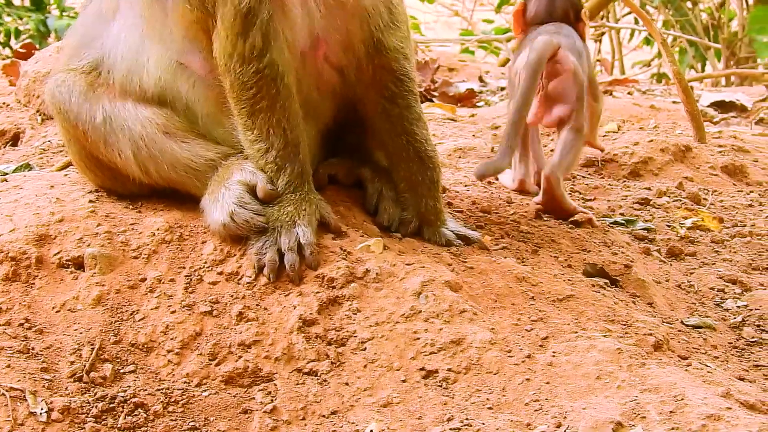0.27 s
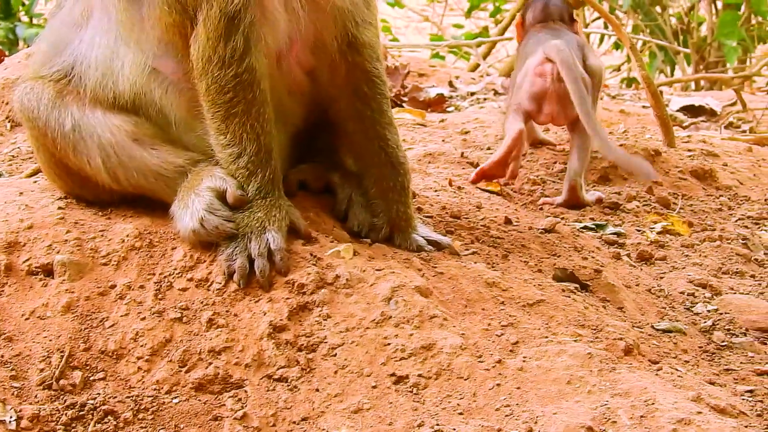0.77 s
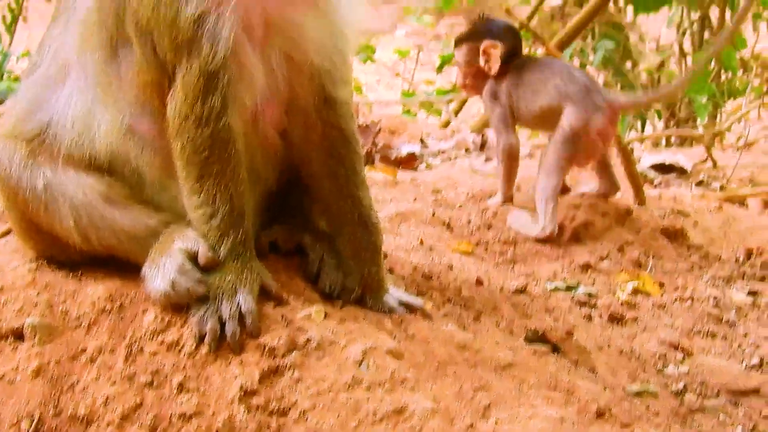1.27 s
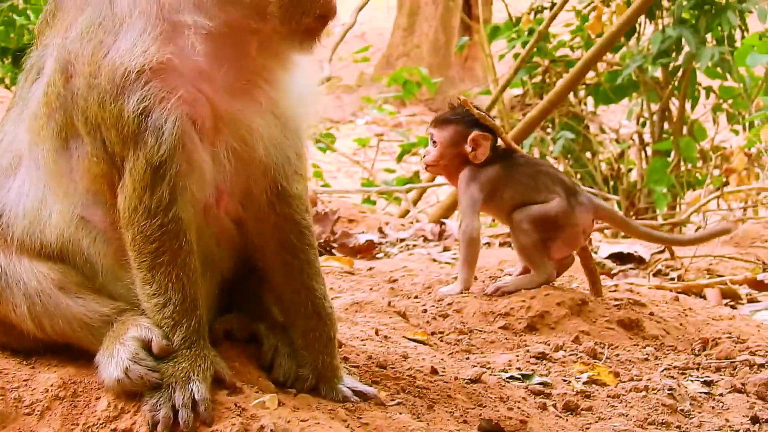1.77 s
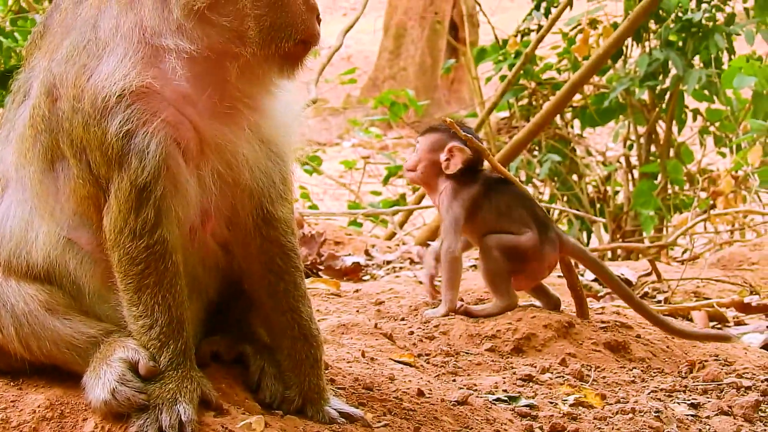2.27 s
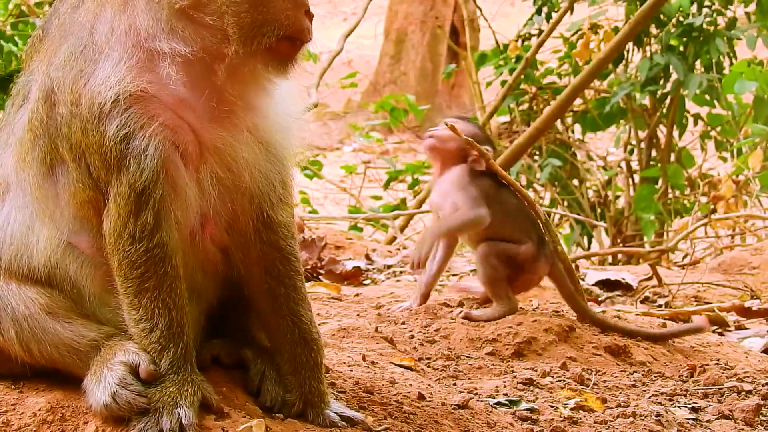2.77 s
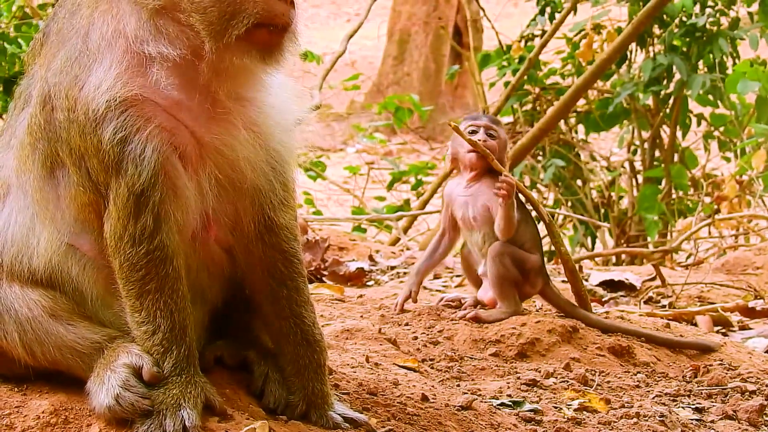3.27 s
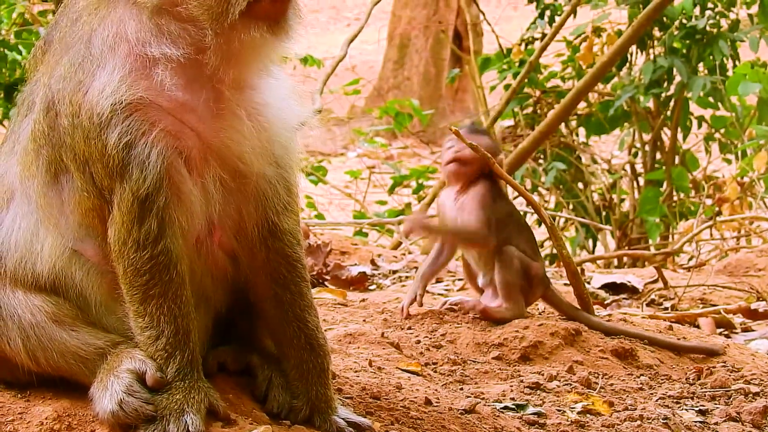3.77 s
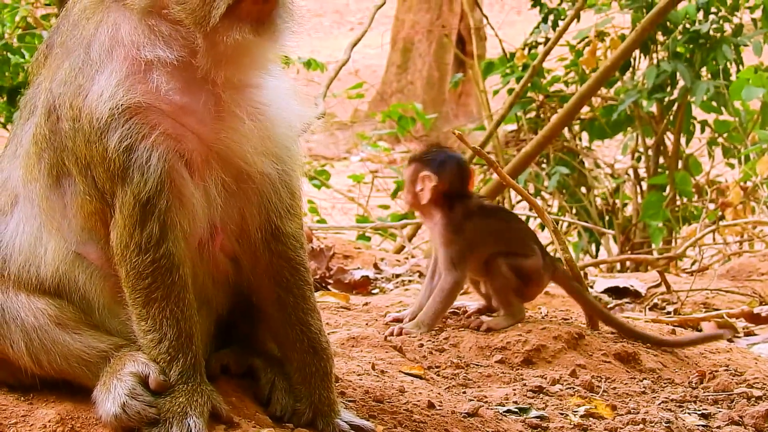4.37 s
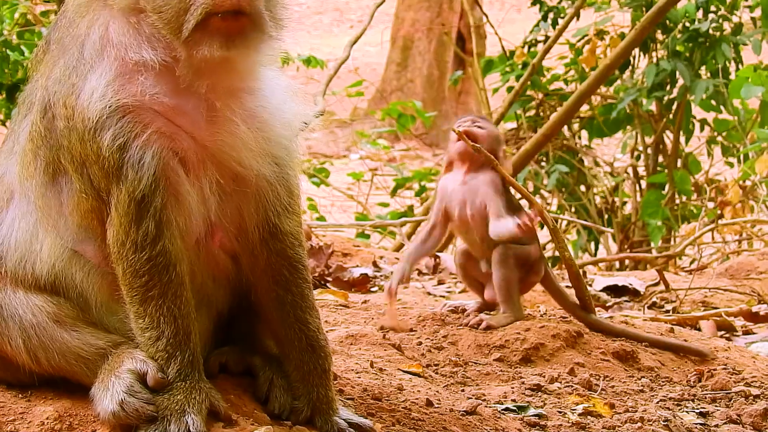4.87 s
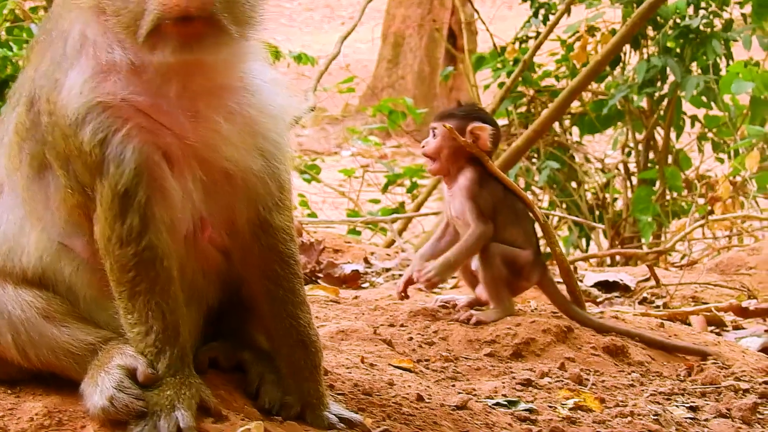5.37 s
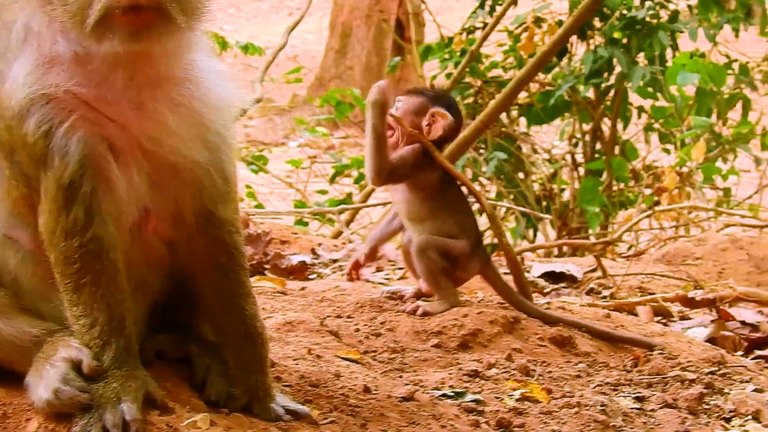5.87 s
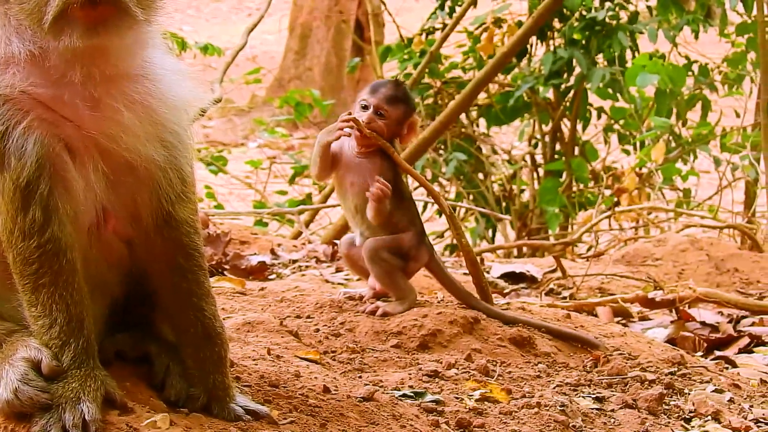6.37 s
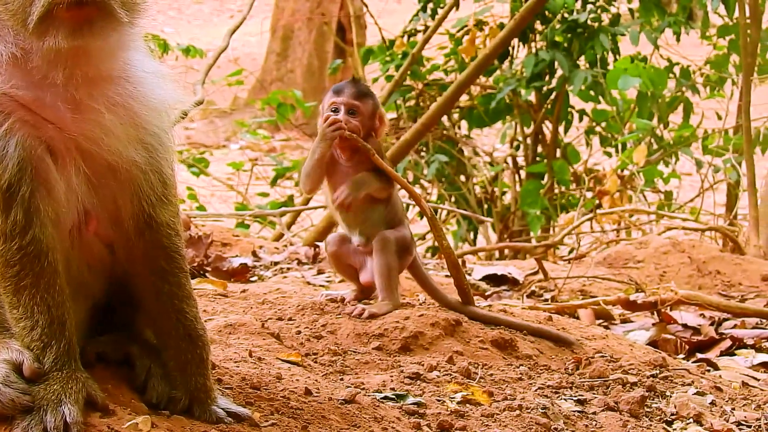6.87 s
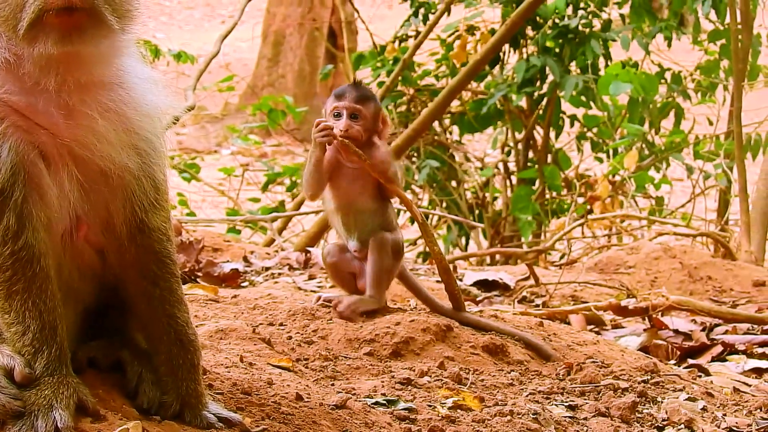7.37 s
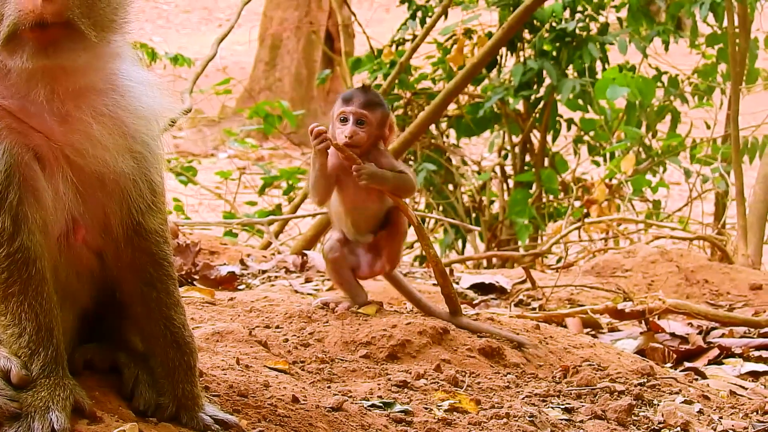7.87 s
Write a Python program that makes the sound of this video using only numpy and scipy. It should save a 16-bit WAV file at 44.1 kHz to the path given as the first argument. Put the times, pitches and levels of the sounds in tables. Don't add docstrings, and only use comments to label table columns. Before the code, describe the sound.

For about eight seconds a loud, dense cicada chorus fills a dry wood, a steady bright hiss and buzz strongest around 3 to 7 kHz, with a lower hum near 1.7 kHz. From the start a nearer cicada throbs raspily about seven times a second, quickening slightly. Around 3 seconds a second one joins with a very thin high whistle; the first fades by about 4.5, and the second continues, easing only at the very end. Far below lie faint traffic rumble, gliding engine tones and a low hum. Dry leaves rustle gently, more noticeably near 2.8 and 3.8. Small twig ticks come at 1.0 and 1.6, a snap at 1.65, a dull soil thump with a snap at 3.6, and a sharper knock and snap at 5.4. Soft distant bird hoots occur near 1.1 and 1.9, then from 6.2 to 7.7. Wide, open outdoor stereo.

```python
import sys
import numpy as np
from scipy import signal
from scipy.fft import rfft, irfft, next_fast_len
from scipy.io import wavfile

SR = 44100
rng = np.random.default_rng(int(sys.argv[2]) if len(sys.argv) > 2 else 0)


def makeup_ratio(level_db):
    decades = np.asarray(level_db, float) / 20
    return 10 ** decades


def pcm_store(signal):
    levels = np.round(np.clip(np.atleast_2d(signal), -1, 1) * 32767)
    wavfile.write(sys.argv[1], SR, levels.astype(np.int16).T)


N = 358533
TIME = np.arange(N) / SR
SIZE = next_fast_len(N + SR // 4)
HZ = np.maximum(np.arange(SIZE // 2 + 1) * SR / SIZE, 1)


def rms_one(x):
    return x / np.sqrt(np.mean(x ** 2) + 1e-20)


def in_time(rows):
    s, *columns = np.transpose(rows)
    return [np.interp(TIME, s, column) for column in columns]


def at_hz(points):
    hz, value = np.transpose(points)
    return np.interp(np.log(HZ), np.log(hz), value)


def filtered(x, gain):
    return irfft(rfft(x, SIZE) * gain, SIZE)[..., :N]


def drift(rate_hz):
    r = np.exp(-2 * np.pi * rate_hz * 40 / SR)
    noise = rng.standard_normal(N // 40 + 2002)
    slow = signal.lfilter([1], [1, -2 * r, r * r], noise)[2000:]
    return np.interp(np.arange(N) / 40, np.arange(len(slow)), rms_one(slow))


def resonance(x, hz, width_hz):
    r = np.exp(-np.pi * width_hz / SR)
    poles = [1, -2 * r * np.cos(2 * np.pi * hz / SR), r * r]
    return signal.lfilter([(1 - r * r) / 2, 0, (r * r - 1) / 2], poles, x + 1e-18)


def spread(mid, side, spectrum):
    # frequency in Hz, side minus mid in dB.
    width = [(60, -23), (99, -22), (160, -21), (270, -18.5), (450, -18), (740, -9), (1220, -14),
             (2010, -12), (3330, -11.5), (5500, -7.5), (9080, -2.5), (15000, -2)]
    colour = makeup_ratio(at_hz(spectrum))
    mid = filtered(mid, colour)
    side = filtered(side, colour * makeup_ratio(at_hz(width)))
    return (mid + side * [[1], [-1]]) / np.std(mid)


def traffic():
    # frequency in Hz, level in dB.
    rumble = [(21, -40), (36, -9), (70, -1.5), (123, 2.5), (139, 0), (199, -9), (253, -15), (347, -13),
              (505, -21), (633, -17.5), (713, -20.5), (1170, -21), (1300, -17.5), (1690, -40), (2860, -120)]
    # start in seconds, length in seconds, pitch in Hz, glide in Hz per second, level in dB.
    engines = [(-.2, 1.2, 136, 3.5, -54), (1.15, 1.8, 118, 11, -47), (3.2, .55, 133, 8, -41),
               (2.0, .95, 169, -2, -48), (5.7, 1.05, 132, 1, -46), (6.2, .5, 108, 4, -44),
               (6.75, .9, 111, 12, -45), (7.4, 1.0, 119, 16, -40), (6.8, 1.2, 140, 12, -52),
               (2.1, 1.0, 86, 4, -50), (5.7, 1.4, 87, 3, -49)]
    fade_s = .25
    road = makeup_ratio(-44.5 + .8 * drift(4.5)) * spread(*rng.standard_normal((2, N)), rumble)
    notes = makeup_ratio(-51 + 1.2 * drift(3)) * np.sin(2 * np.pi * 48.7 * TIME)
    for s, length_s, start_hz, glide, db in engines:
        hz = start_hz + glide * np.clip(TIME - s, 0, length_s)
        near = np.clip(np.minimum(TIME - s, s + length_s - TIME) / fade_s, 0, 1)
        turns = np.cumsum(hz + 0.7 * drift(2.5)) / SR
        notes += near * makeup_ratio(db + 1.9 * drift(4.6)) * np.sin(2 * np.pi * turns)
    return road + notes


def struck(events, rings_hz, widths_hz):
    out = np.zeros(N)
    for (s, db, *_), hz, width_hz in zip(events, rings_hz, widths_hz):
        at = round(s * SR)
        impulse = np.r_[1, np.zeros(SR // 8)]
        ring = resonance(resonance(impulse, hz, width_hz), hz, width_hz)[:N - at]
        out[at:at + len(ring)] += makeup_ratio(db) * ring / np.abs(ring).max()
    return out


def ground():
    # middle in seconds, length in seconds, level in dB.
    stirs = [(.25, .3, -50), (1.655, .04, -46), (2.84, .3, -41), (2.94, .08, -45), (3.24, .08, -49),
             (3.84, .2, -46), (4.08, .1, -47), (4.6, .3, -49), (4.9, .15, -49), (5.45, .03, -46),
             (6.47, .12, -52), (7.28, .14, -50), (8.08, .15, -46)]
    # time in seconds, peak in dB, pitch in Hz, bandwidth as a share of pitch.
    knocks = [
        (2.239, -43, 358, 0.23),
        (2.785, -43, 520, 0.26),
        (3.609, -51, 250, 0.22),
        (3.862, -43, 961, 0.17),
        (4.867, -49, 334, 0.2),
        (5.443, -36, 939, 0.2),
        (7.89, -43.5, 250, 0.26),
    ]
    # time in seconds, peak in dB, pitch in Hz.
    thumps = [
        (3.605, -28, 150),
    ]
    # time in seconds, peak in dB.
    snaps = [
        (1.652, -36),
        (3.61, -42),
        (5.443, -36),
    ]
    # time in seconds, peak in dB.
    ticks = [(0.0997, -43), (1.0046, -37), (1.5753, -40), (1.6462, -39), (5.2375, -41), (6.4792, -44),
             (6.8808, -44)]
    leaves = [(150, -6), (260, -2.0), (500, -8.0), (1100, -7.0), (1500, -27.5)]   # (Hz, dB)
    grains = rng.standard_normal((2, N)) * makeup_ratio(2 * drift(60))
    stirring = makeup_ratio(-56 + 4 * drift(4.8))
    for s, length_s, db in stirs:
        stirring = stirring + makeup_ratio(db) * np.cos(np.pi * np.clip((TIME - s) / length_s, -.5, .5)) ** 2
    rustle = makeup_ratio(-5.0) * stirring * spread(*grains, leaves)
    impacts = struck(knocks, [e[2] for e in knocks], [e[3] * e[2] for e in knocks])
    impacts += struck(snaps, [700] * len(snaps), [1600] * len(snaps))
    impacts += struck(thumps, [e[2] for e in thumps], [50] * len(thumps))
    impacts += struck(ticks, [14200] * len(ticks), [2500] * len(ticks))
    return rustle + impacts


def bird():
    # start in seconds, length in seconds, pitch in Hz, level in dB.
    hoots = [(1.1, .22, 770, -54), (1.95, .14, 915, -50), (6.236, .13, 764, -54), (6.42, .16, 765, -54),
             (6.55, .12, 955, -50), (6.95, .18, 900, -49), (7.02, .18, 970, -51), (7.06, .18, 1030, -53),
             (7.27, .12, 1065, -50), (7.38, .1, 760, -52), (7.6, .12, 1065, -54)]
    out = np.zeros(N)
    waver = np.cumsum(22 * drift(30)) / SR
    for s, length_s, hz, db in hoots:
        shape = np.sin(np.pi * np.clip((TIME - s) / length_s, 0, 1))
        out += makeup_ratio(db - 1.5) * shape * np.sin(2 * np.pi * (hz * TIME + waver))
    return out * makeup_ratio(3 * drift(30))


def chorus():
    # frequency in Hz, density in dB per Hz.
    chorus_spectrum = [(1120, -44.5), (1250, -36.5), (1420, -21), (1720, -10), (1810, -10), (2020, -17), (2200, -21),
                       (2410, -22.5), (2710, -18), (3140, -3.5), (3320, 0.2), (3490, -0.0), (3960, -4.5),
                       (4090, -7.5), (4310, -5.5), (4480, -8), (4780, -4), (5210, -2.5), (5730, -6), (5900, -5),
              (6420, -3.5), (6760, -2.5), (7110, -6), (7240, -7), (7540, -10), (8570, -18.5),
                       (8740, -20.9), (9520, -24.9), (9990, -29.7), (10470, -28.5), (10980, -32.3), (11800, -32.3),
               (12100, -36.3), (12790, -37.6), (13480, -41.0), (13950, -45.1), (14770, -46.8),
               (15680, -53.1)]
    # frequency in Hz, width in Hz, boost in dB.
    cores = [(1735, 70, 2.5), (3470, 70, 1.5), (4280, 80, 2), (4570, 70, 2.5), (5920, 60, 3), (6100, 50, 2)]
    # frequency in Hz, width in Hz, sway in dB.
    sways = [(1700, 530, 1), (3230, 870, 0.5)]
    clicks_per_s, click_share = 12000, .4
    sizes_db = 2.0 * np.minimum(rng.exponential(1, (2, N)), 4)
    sizes = makeup_ratio(sizes_db) * rng.choice([-1, 1], (2, N))
    clicks = sizes * (rng.random((2, N)) < clicks_per_s / SR)
    blur = rng.standard_normal((2, N))
    crowd = np.sqrt(click_share) * rms_one(clicks) + np.sqrt(1 - click_share) * blur
    cores_db = sum(db * np.exp(-2 * ((HZ - hz) / width_hz) ** 2) for hz, width_hz, db in cores)
    body = [(800, -70)] + chorus_spectrum
    song = spread(*filtered(crowd, makeup_ratio(cores_db)), body)
    for hz, width_hz, db in sways:
        song = song + (makeup_ratio(db * drift(3.8)) - 1) * resonance(song, hz, width_hz)
    return makeup_ratio(-17 + 0.28 * drift(10)) * song


def whistle():
    # frequency in Hz, width in Hz.
    lines = [(11200, 70), (11600, 90)]
    start_s, rise_s = 3.0, .6
    air = rng.standard_normal((2, N))
    tone = sum(rms_one(resonance(resonance(air, hz, width_hz), hz, width_hz)) for hz, width_hz in lines)
    return makeup_ratio(-65) * np.clip((TIME - start_s) / rise_s, .2, 1) * tone


def throbbing(start_s, gap_s, quickening_s, throb_s):
    count = np.arange(40)
    late, strong = rng.standard_normal((2, 40))
    times = start_s + gap_s * count - quickening_s * count * (count - 1) / 2 + .004 * late
    swell = np.zeros(N)
    for s, z in zip(times, strong):
        swell += makeup_ratio(.8 * z) * np.exp(-.5 * np.abs((TIME - s) / throb_s) ** 3)
    return swell


def singer(pace, modes, buckles_per_s, throb_s, hiss, weak_db):
    swell = throbbing(*pace, throb_s)
    turns = np.cumsum(buckles_per_s * (1 + 0.003 * drift(3) + .006 * drift(150))) / SR
    count = np.floor(turns)
    strength_db = weak_db * (count % 2) + 1.7 * drift(100)
    clicks = rms_one(np.diff(count, prepend=0) * makeup_ratio(strength_db))
    scattered = rng.standard_normal((2, N)) * np.cos(np.pi * turns) ** 2
    ribs = np.sqrt(1 - hiss) * clicks + np.sqrt(hiss) * rms_one(scattered)
    body = np.zeros((2, len(HZ)))
    for hz, width_hz, db, pan_db in modes:
        bell = np.exp(-2 * np.log(2) * ((HZ - hz) / width_hz) ** 2)
        sides = makeup_ratio(db + pan_db * np.array([[.5], [-.5]]))
        body += sides * bell / np.sqrt(np.mean(bell ** 2))
    return swell * filtered(ribs, body)


def near_singers():
    # frequency in Hz, width in Hz, level in dB, left-right in dB.
    first_modes = [(4700, 300, -31, 0), (6200, 450, -29, 0), (7850, 600, -34, 1.5), (9230, 380, -40, 0.5),
                   (11700, 1200, -56, 1), (13850, 650, -58, 0), (15400, 350, -68, 0)]
    second_modes = [(6600, 900, -28, 0), (7800, 900, -36, 1), (9250, 700, -52, 0), (11200, 250, -59, -1.5),
                    (11580, 250, -56, 0.5), (12920, 320, -53.5, 0), (14500, 750, -61, 0)]
    # time in seconds, first singer in dB, second singer in dB.
    handover = [
        (2.9, .8, -9),
        (3.5, .8, 1.5),
        (4.0, -2, 1.8),
        (4.5, -12, 1.8),
        (7.8, -60, 1.8),
        (8.1, -60, -2),
    ]
    first = singer((-.044, .1444, .0008), first_modes, buckles_per_s=262, throb_s=.025, hiss=.55, weak_db=-6)
    second = singer((3.078, .1504, .0007), second_modes, buckles_per_s=275, throb_s=.028, hiss=.5, weak_db=-3)
    first_db, second_db = in_time(handover)
    return makeup_ratio(first_db) * first + makeup_ratio(second_db) * second


def scene():
    return traffic() + ground() + bird() + chorus() + whistle() + near_singers()


def low_pass(x):
    return signal.sosfilt(signal.butter(12, 15750, fs=SR, output="sos"), x)


def record(dry):
    # frequency in Hz, level in dB.
    late_copy = [(2800, -35), (3330, -16), (3530, -13), (3730, -10), (3830, -5.5), (3930, -3.5), (4020, -6),
                 (4070, -30), (4200, -60)]
    # frequency in Hz, left-right in dB.
    balance = [(60, 0.5), (130, 0.5), (290, 0.5), (640, -0.5), (1410, 0.0), (3100, 0.5), (6820, -0.5),
               (15000, 1.2)]
    late_s = .01007
    late = makeup_ratio(at_hz(late_copy))
    comb = (1 + late * np.exp(-2j * np.pi * HZ * late_s)) / np.sqrt(1 + late ** 2)
    lean = makeup_ratio(at_hz(balance) * np.array([[.5], [-.5]]))
    low_cut = 1 / np.sqrt(1 + (42 / HZ) ** 12)
    return low_pass(filtered(dry, comb * lean * low_cut))


dry = scene()
out = record(dry)
pcm_store(out)
```